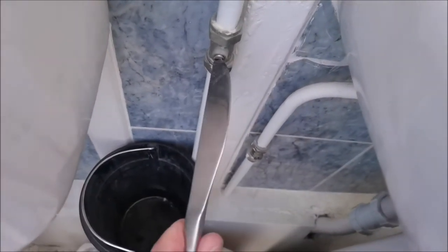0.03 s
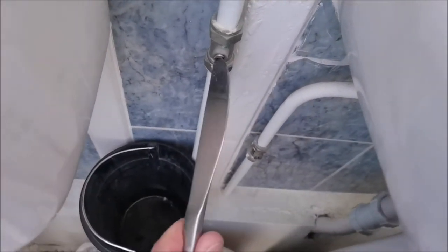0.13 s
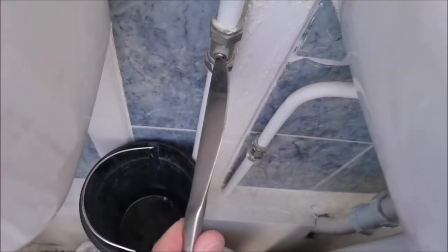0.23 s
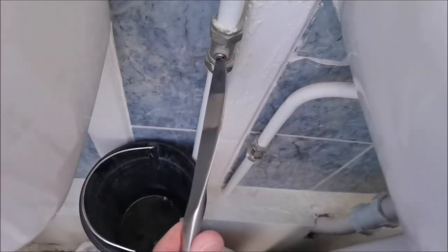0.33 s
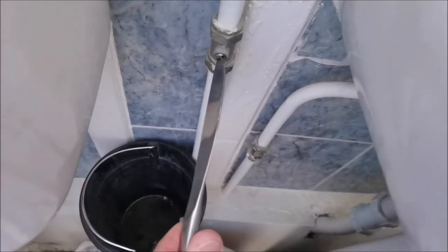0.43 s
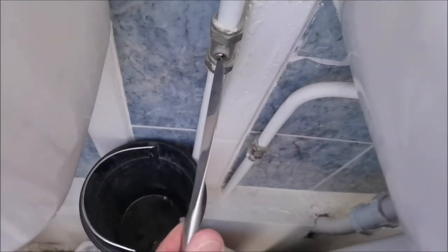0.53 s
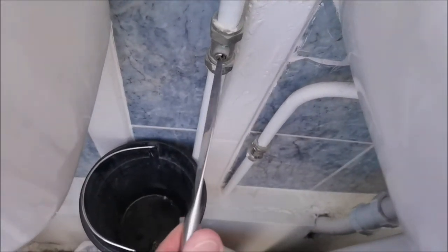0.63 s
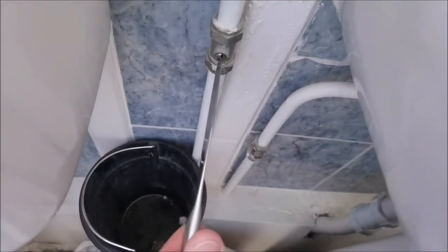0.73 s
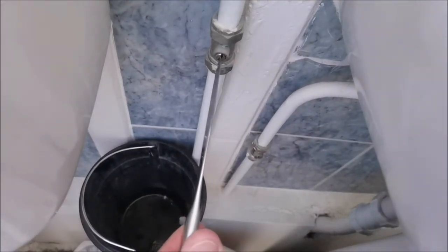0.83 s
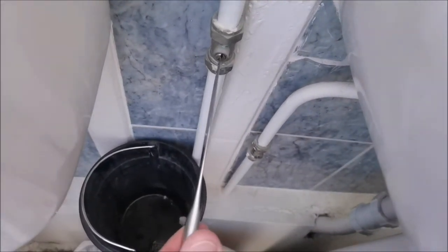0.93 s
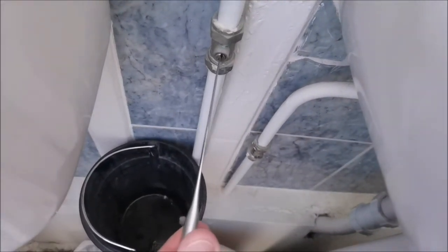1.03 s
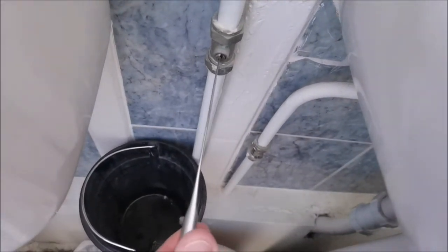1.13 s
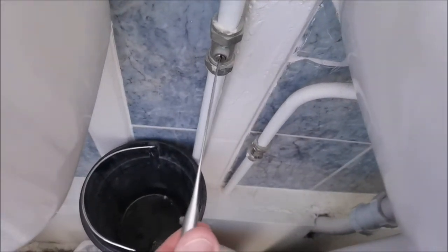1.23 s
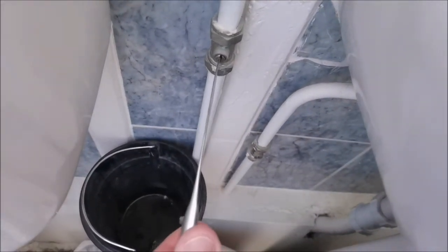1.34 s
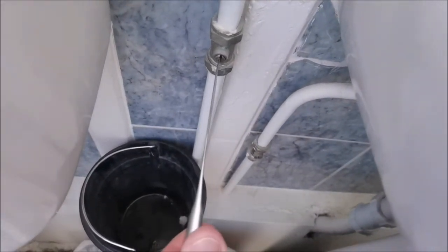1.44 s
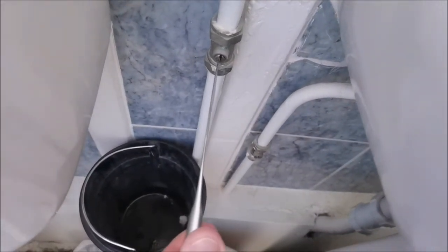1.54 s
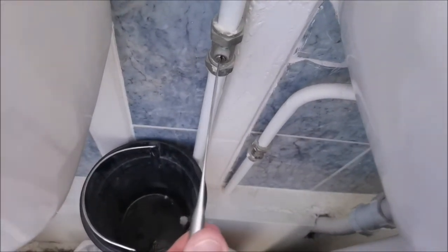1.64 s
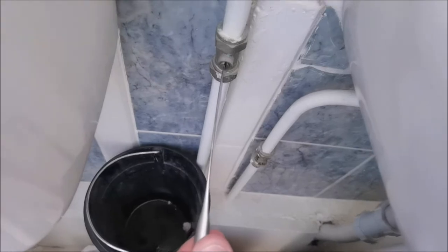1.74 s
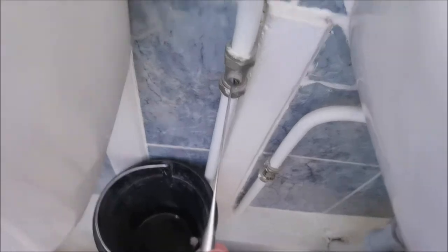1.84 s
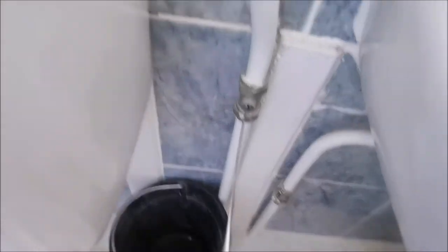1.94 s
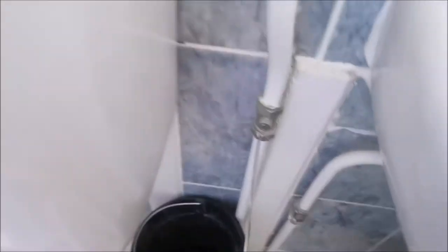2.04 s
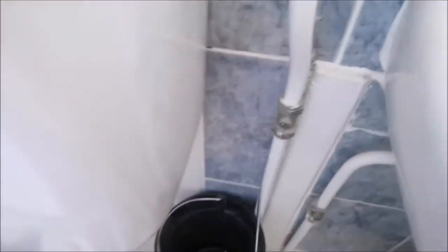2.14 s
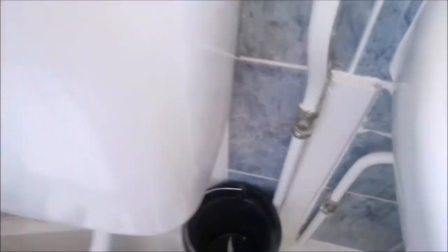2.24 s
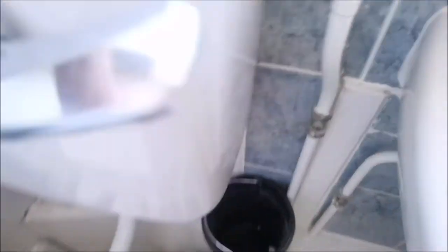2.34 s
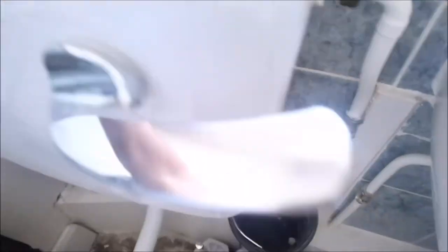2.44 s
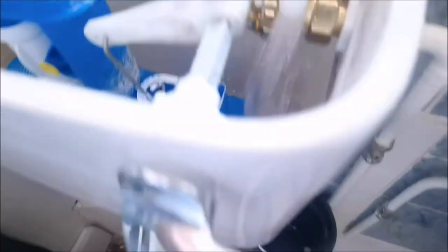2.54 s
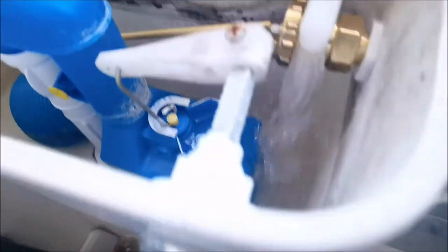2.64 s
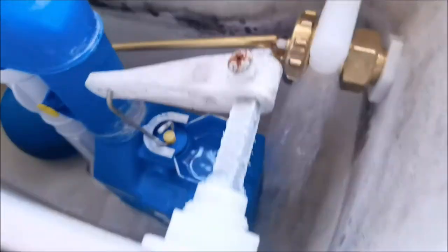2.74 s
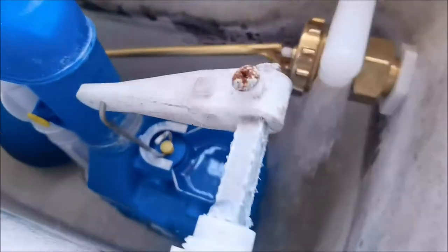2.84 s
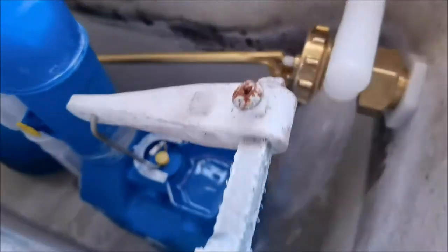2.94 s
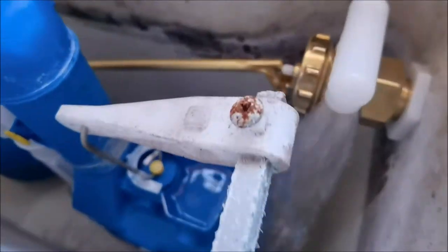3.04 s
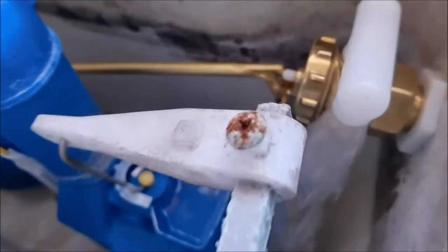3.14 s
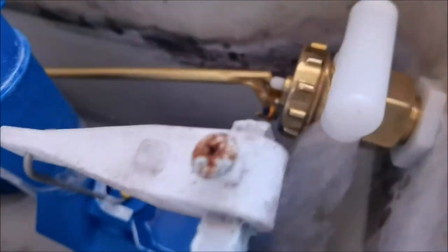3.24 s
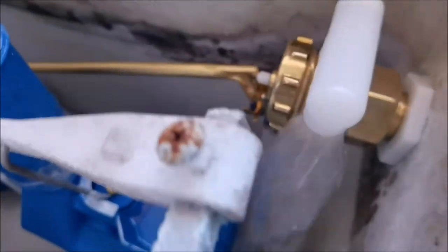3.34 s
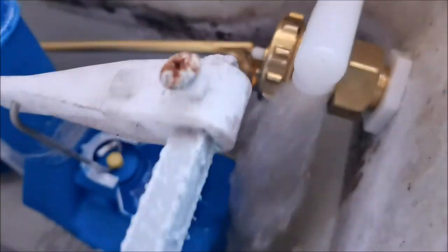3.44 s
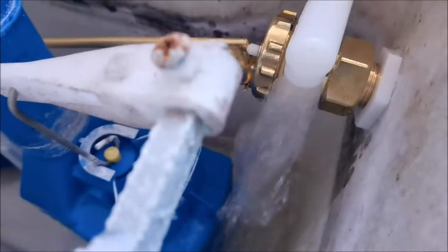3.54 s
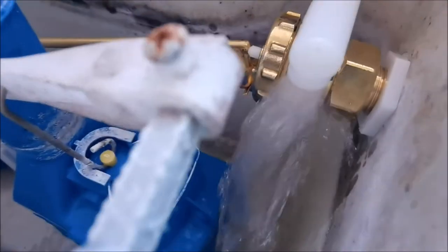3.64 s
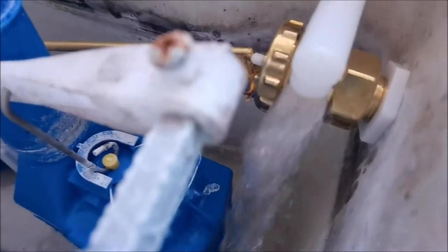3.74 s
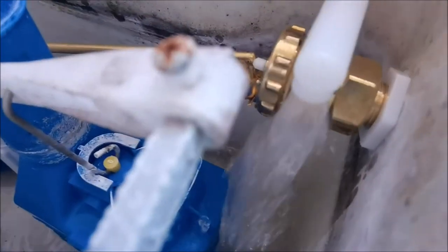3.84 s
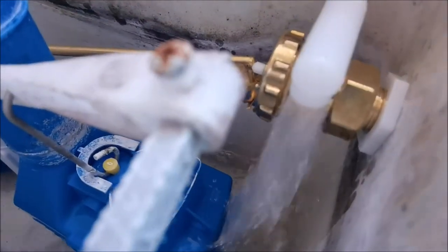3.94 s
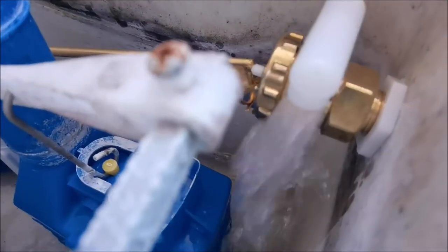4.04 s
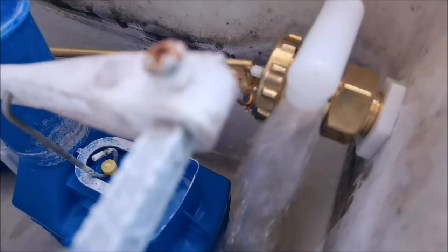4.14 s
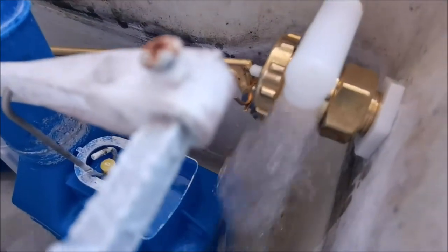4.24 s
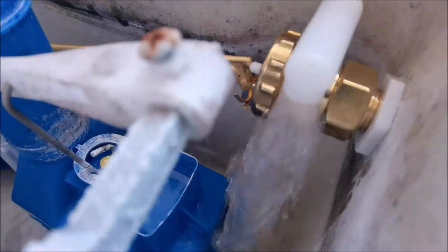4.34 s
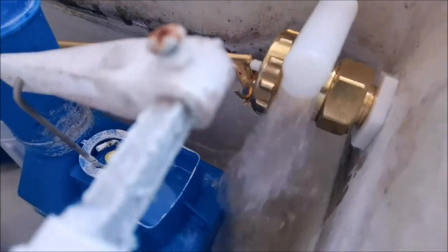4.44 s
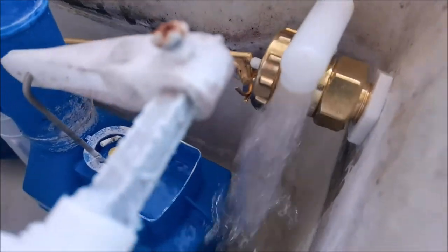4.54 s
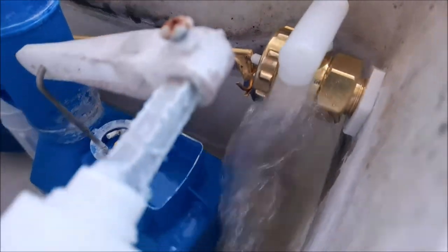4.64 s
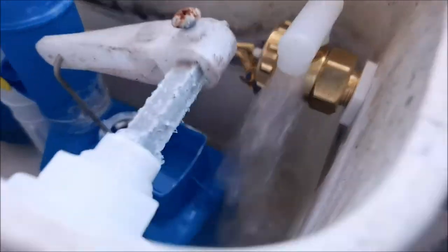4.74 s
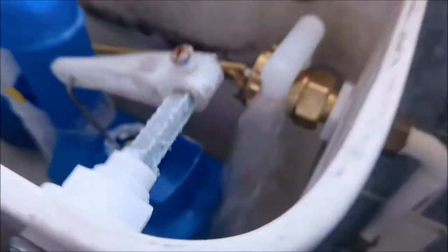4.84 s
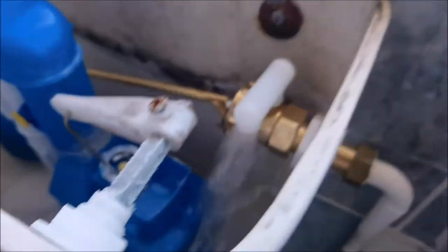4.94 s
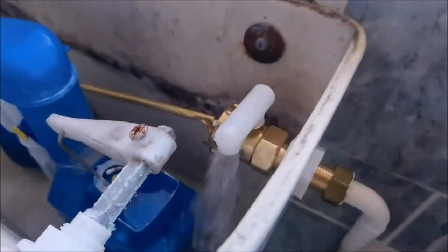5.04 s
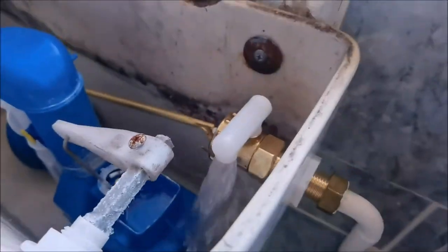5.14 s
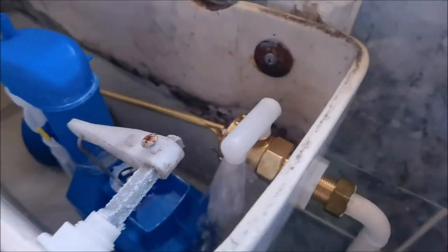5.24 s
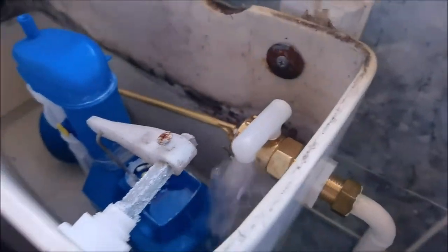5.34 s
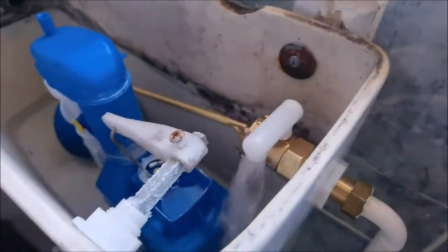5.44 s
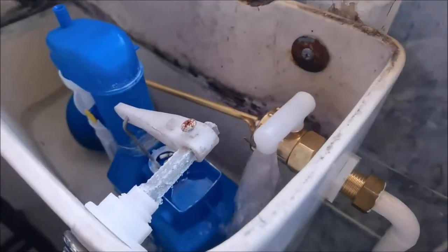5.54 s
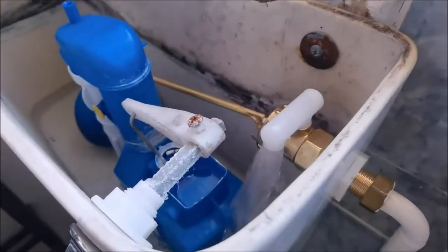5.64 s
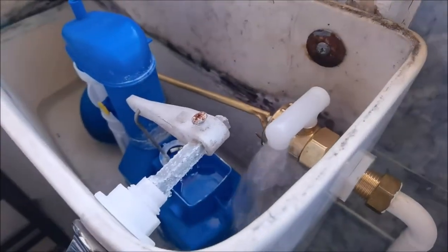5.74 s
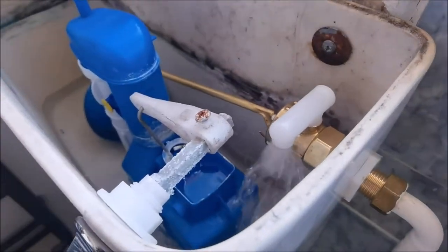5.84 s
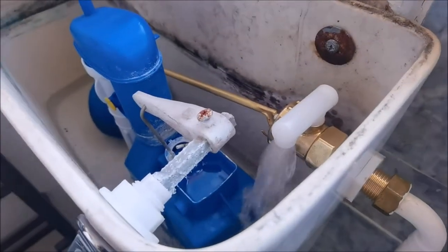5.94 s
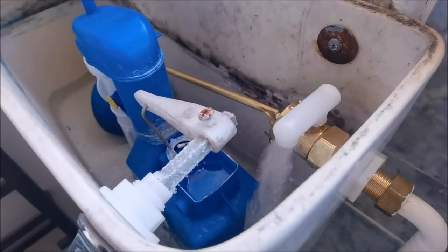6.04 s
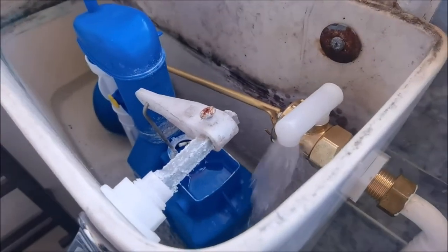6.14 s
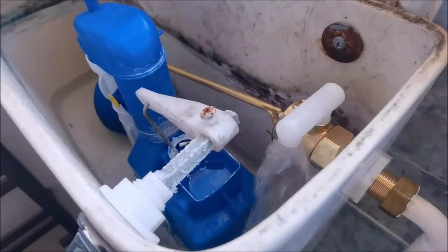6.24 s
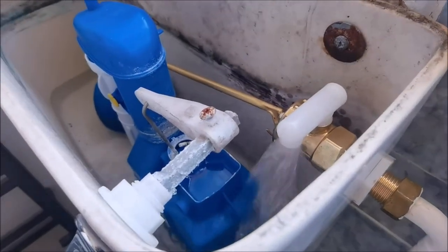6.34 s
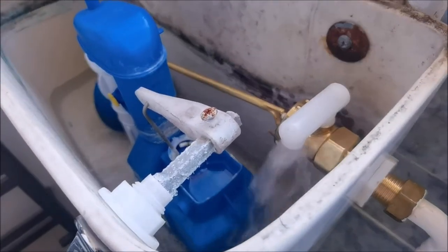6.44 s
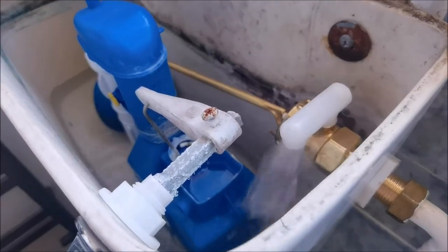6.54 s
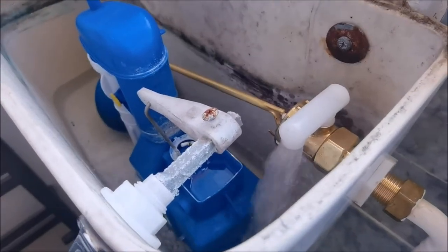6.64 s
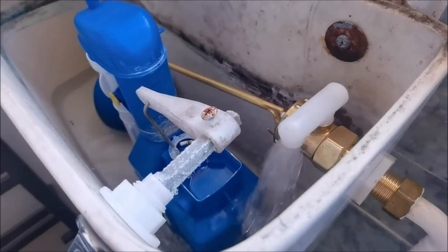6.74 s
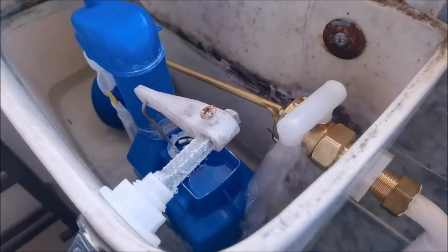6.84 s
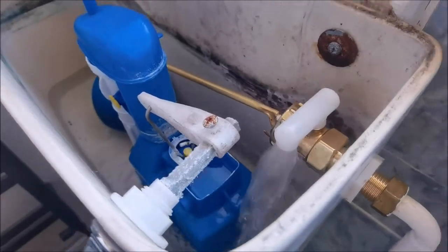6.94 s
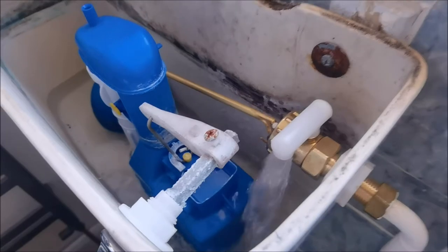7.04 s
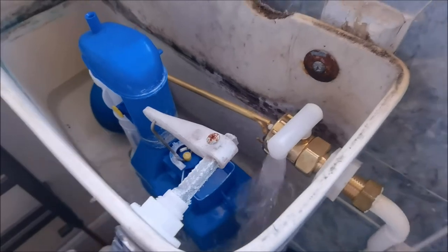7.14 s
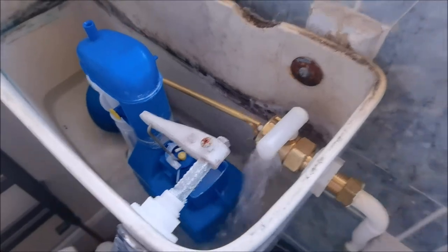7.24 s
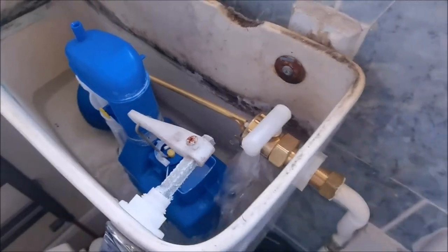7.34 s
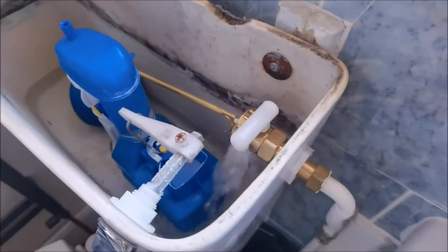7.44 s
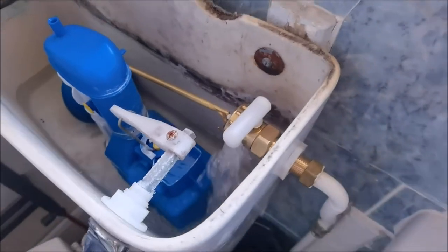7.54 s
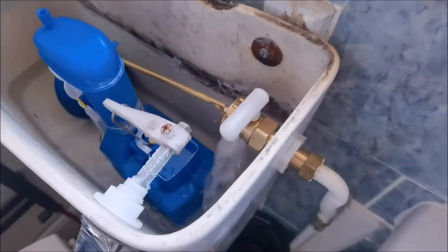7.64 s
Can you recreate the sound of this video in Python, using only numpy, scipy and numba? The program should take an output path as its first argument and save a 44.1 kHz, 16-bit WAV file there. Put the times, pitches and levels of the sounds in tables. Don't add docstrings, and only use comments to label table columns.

```python
import sys
import numpy as np
from scipy import signal
from scipy.fft import rfft, irfft
from scipy.io import wavfile
from scipy.ndimage import uniform_filter1d, minimum_filter1d, map_coordinates
from numba import njit

SR = 44100
rng = np.random.default_rng(int(sys.argv[2]) if len(sys.argv) > 2 else 0)


def to_wav(s):
    ch = np.atleast_2d(s).T
    pcm = np.round(np.clip(ch, -1, 1) * 32767)
    wavfile.write(sys.argv[1], SR, pcm.astype(np.int16))


def magnitude_from_level(level_db):
    exponent = np.asarray(level_db, float) / 20
    return 10 ** exponent


N = 338688

LIFT_S = 2.06
LIFT_FADE_DB_S = -40


def curve(table):
    s, *columns = np.transpose(table)
    return [np.interp(np.arange(N) / SR, s, column) for column in columns]


def on_log(table, hz):
    table_hz, db = np.transpose(table)
    return np.interp(np.log(hz + 1), np.log(table_hz), db)


def walk(rate, count=1, at=np.arange(N)):
    hop = 32
    k = int(SR / hop / rate)
    held = np.repeat(rng.standard_normal((count, N // hop // k + 1)), k, axis=1)
    slewed = uniform_filter1d(uniform_filter1d(held, k), k)
    return 1.314 * slewed[:, at // hop]


# (time [s], level over the hum [dB], length [s])
GULP_EVENTS = [(0.077, 8, 0.046), (0.322, 5, 0.02), (0.422, 6, 0.027), (.56, 8, 0.03), (0.692, 9, 0.027),
               (0.767, 4, 0.02), (0.884, 7, 0.014), (1.03, 5.5, .04), (1.39, 2, 0.081), (1.565, 4.5, 0.044),
               (1.975, 2, 0.05), (2.187, 4.5, 0.018)]


def gulps(t):
    return sum(db * np.exp(-((t - s) / length) ** 2) for s, db, length in GULP_EVENTS)


# (time [s], jet pressure re full [dB])
VALVE_OPENING = [
    (0, -1),
    (.05, -26.5),
    (.12, -13),
    (.22, -10),
    (.35, -3),
    (.6, -2.5),
    (.9, 0),
    (7.6, 0),
    (7.68, -1),
]


def water(tank, inside, near_db):
    t = np.arange(N) / SR
    valve_db, = curve(VALVE_OPENING)
    air = np.exp(-t / 1.9)
    hum_db = -33.5 + 4 * air + 0.46 * valve_db
    rumble_db = hum_db + 16.5 + 4.5 * np.exp(-((t - LIFT_S - 0.2) / 0.53) ** 2)
    gulping_db = hum_db + gulps(t) + 20.5
    splash_db = -29.5 + 4.5 * air + 0.11 * valve_db + 14
    hiss_db = -18.5 + valve_db
    spray_db = -35.5 + valve_db + 0.5 * inside + 21.5
    levels_db = np.array([rumble_db, gulping_db, splash_db, hiss_db, spray_db])
    levels_db += near_db + 0.81 * walk(22, count=5)
    gains = magnitude_from_level(levels_db)
    sputter = magnitude_from_level(0.66 * walk(19)[0] + 0.44 * walk(35)[0] + 1.99 * walk(300)[0])
    drive = magnitude_from_level(0.31 * walk(15)[0] + 0.86 * walk(200)[0]) * rng.standard_normal(N)

    shared, *wide = magnitude_from_level(8.5) * jet(tank, levels_db, sputter, patchy_db=1.35, bass_patchy_db=4.0)
    shared += pipe_singing(t, valve_db, gains, drive)
    shared += tank_ringing(tank, gains, drive)
    shared += rising_tones(t, inside, air, gains, drive)
    shared += air_columns(gains, drive)
    shared += gurgle(t, valve_db, gains, drive)
    shared += bubbles(levels_db[1] - 24.0, count=2000, cycles=5.42, scatter_db=4.0)
    return shared, np.array(wide)


# (frequency [Hz], level [dB per Hz])
JET_BY_PIPE = [(24, -49), (40, -17.5), (184, -7.5), (289, -29.5), (454, -1), (527, -22), (730, -14.5),
               (1240, -26), (1440, -13.5), (2430, -15), (4010, -10.5), (4430, -10.5), (6450, 7),
               (10400, -17.5), (15900, -26)]
# (frequency [Hz], level [dB per Hz])
JET_OVER_TANK = [(24, -50), (40, -22), (85, -16.5), (214, -14), (275, -6), (411, -16), (465, 3.5),
                 (514, -25.5), (1120, -19), (1330, -21.5), (2140, -14), (4320, -12.5), (7310, 6.5),
                 (9390, -16), (15900, -28)]


def jet(tank, levels_db, sputter, patchy_db, bass_patchy_db):
    frame, overlap = 1024, 768
    noise = sputter * rng.standard_normal((3, N))
    hz, s, bins = signal.stft(noise, SR, nperseg=frame, noverlap=overlap)
    at = np.minimum((s * SR).astype(int), N - 1)
    by_pipe_db = on_log(JET_BY_PIPE, hz)[:, None]
    over_tank_db = on_log(JET_OVER_TANK, hz)[:, None]
    colour_db = by_pipe_db * (1 - tank[at]) + over_tank_db * tank[at]
    regions_hz = np.array([150, 650, 2700, 6800, 12500])
    patches_hz = 16000 * np.linspace(0.05, 1, 40) ** 2
    depth_db = np.where(patches_hz < 200, bass_patchy_db, patchy_db)[:, None]
    surge_db = walk(21, count=40, at=at) * depth_db
    for centres_hz, rows_db in ((regions_hz, levels_db[:, at]), (patches_hz, surge_db)):
        place = np.interp(np.log(hz + 1), np.log(centres_hz), np.arange(len(centres_hz)))
        low = np.minimum(place.astype(int), len(centres_hz) - 2)
        share = (place - low)[:, None]
        colour_db = colour_db + rows_db[low] * (1 - share) + rows_db[low + 1] * share
    return signal.istft(bins * magnitude_from_level(colour_db), SR, nperseg=frame, noverlap=overlap)[1][:, :N]


@njit
def svf(x, hz, width):
    y, b, l, b2, l2, g, k = np.empty(len(x)), 0., 0., 0., 0., 0., 0.
    for i in range(len(x)):
        if i % 32 == 0:
            g = np.tan(np.pi * hz[i] / SR)
            k = width / hz[i]
        v = (b + g * (x[i] - l)) / (1 + g * (g + k))
        b, l = 2 * v - b, l + 2 * g * v
        v = (b2 + g * (k * v - l2)) / (1 + g * (g + k))
        b2, l2, y[i] = 2 * v - b2, l2 + 2 * g * v, k * v
    return y


def ring(modes, gains, drive, flicker_db):
    out = np.zeros(N)
    for hz, width, db in modes:
        rung = svf(drive, hz * (1 + 0.0041 * walk(3.146)[0]), 1.266 * width)
        region = np.searchsorted([1300, 4800], np.mean(hz)) + 1
        out += gains[region] * magnitude_from_level(db + flicker_db * walk(24)[0]) * rung
    return out


# (frequency [Hz], width [Hz], level [dB])
PIPE_RINGS = [(2970, 35, -20), (3340, 16, -13), (3900, 53, -11.5), (5100, 180, -2), (6340, 110, -13),
              (6600, 120, -13), (6950, 96, 1.5), (7830, 230, 0), (9080, 360, -0.5),
              (6520, 60, 6)]


def pipe_singing(t, valve_db, gains, drive):
    sing_db = 1.9 + 0.5 * valve_db - 54 * np.maximum(t - 1.58, 0)
    return magnitude_from_level(12.5 + sing_db) * ring(PIPE_RINGS, gains, drive, flicker_db=1.0)


# (frequency [Hz], width [Hz], level [dB])
TANK_RINGS = [(2923, 29, -10), (3161, 92, -8.5), (3730, 194, -10), (4460, 94, -3), (5213, 73, -3),
              (6210, 43, 4), (6650, 83, -19), (7900, 170, 0), (8255, 120, -2.5), (5800, 520, -36.5)]


def tank_ringing(tank, gains, drive):
    return magnitude_from_level(10.0) * np.sqrt(tank) * ring(TANK_RINGS, gains, drive, flicker_db=4.0)


def rising_tones(t, inside, air, gains, drive):
    pipe_hz = 2199 + 40 * t
    tank_hz = 1997 + 25.5 * t - 65 * inside
    upper_hz = np.where(t < LIFT_S, pipe_hz, tank_hz)
    upper_db = 6.5 - 4.5 * inside + 1.5 * (t < LIFT_S)
    upper_db -= 14 * np.maximum(1.1 - t, 0)
    upper_db -= 10 * np.exp(-((t - LIFT_S) / 0.18) ** 2)
    lower_hz = 723 + 48.4 * inside
    lower_db = -0.6 + 7 * air
    return ring([(upper_hz, 70., upper_db), (lower_hz, 40., lower_db)], gains, drive, flicker_db=2.0)


# (frequency [Hz], width [Hz], level [dB])
AIR_RINGS = [(272.5, 17.7, -12.5), (453.5, 23.4, 0), (478.4, 12.8, 0), (548, 13, -7.5), (1150, 46, -11.5),
             (1671, 24, -11.5)]


def air_columns(gains, drive):
    return magnitude_from_level(10.5) * ring(AIR_RINGS, gains, drive, flicker_db=2.5)


# (frequency [Hz], width [Hz], level [dB])
GURGLE_RINGS = [(185, 18.4, -7), (1452, 30, -6.5), (1794, 170, -13), (940, 95, -17)]


def gurgle(t, valve_db, gains, drive):
    gurgle_db = 0.4 * valve_db - 7.5 * t + LIFT_FADE_DB_S * np.maximum(t - LIFT_S, 0)
    return magnitude_from_level(19.0 + gurgle_db) * ring(GURGLE_RINGS, gains, drive, flicker_db=2.0)


def bubbles(level_db, count, cycles, scatter_db):
    out = np.zeros(N + SR)
    for when, size, loud in rng.random((count, 3)):
        hz, start = 350 * 12 ** size, int(when * N)
        turns = np.arange(int(3 * cycles * SR / hz)) * hz / SR
        tone = np.sin(2 * np.pi * turns * (1 + 0.058 * turns / cycles))
        tone *= np.exp(-turns / cycles) * (1 - np.exp(-turns))
        out[start:start + len(turns)] += magnitude_from_level(level_db[start] - scatter_db * np.log(loud)) * tone
    return out[:N]


# (time [s], peak level [dB], push [ms], body ring [Hz])
FINGER_THUMPS = [(1.266, -16.5, 1.1, 120), (1.479, -31, 2, 110), (2.054, -33, 1.7, 120),
                 (2.497, -27, 3, 88), (2.658, -17, 0.22, 145), (3.044, -10, .5, 94), (3.054, -10, 3, 85),
                 (3.088, -25, 2.7, 82), (3.375, -0.5, .61, 97), (3.407, -8.5, 2.7, 93), (3.418, -15, 3, 93),
                 (3.538, -19, 0.61, 103), (3.597, -26, 3.3, 80), (3.645, -27, 3, 80), (4.0, -29, 1.8, 109),
                 (4.269, -33, 3, 95), (4.491, -28, 2.2, 85), (5.019, -33, 3, 95), (5.148, -14.5, 1.1, 95),
                 (6.002, -29, 2.4, 110), (6.404, -31, 2.9, 104), (7.122, -23, 1.7, 85), (7.3, -29, 2.3, 92),
                 (7.64, -33, 3, 90)]
# (time [s], level [dB])
NAIL_TICKS = [
    (3.043, 6),
    (3.374, -18),
    (3.538, -18),
]


def thumps():
    out = np.zeros((2, N + SR))
    lead = SR // 50
    t = np.arange(-lead, SR // 8) / SR
    for side, (late_s, port_db) in enumerate([(0.0009, 0), (0, 2.5)]):
        u, gain = t - late_s, magnitude_from_level(port_db)
        for s, db, push_ms, hz in FINGER_THUMPS:
            push = -0.5 * np.exp(-0.5 * (u / push_ms * 1000) ** 2)
            decay_s = np.where(u > 0, 0.012, 0.006)
            body = -0.55 * np.cos(2 * np.pi * hz * u) * np.exp(-np.abs(u) / decay_s)
            start = int(s * SR) - lead
            out[side, start:start + len(t)] += gain * magnitude_from_level(db) * (push + body)
        for s, db in NAIL_TICKS:
            start = int(s * SR) - lead
            out[side, start:start + len(t)] -= gain * magnitude_from_level(db) * np.exp(-np.abs(u) / 0.00041)
    return out[:, :N]


@njit
def tiles(x, lags, drift, gain, damp):
    line, soft, out = np.zeros((8, 4096)), np.zeros(8), np.zeros((2, len(x)))
    for i in range(len(x)):
        total = 0.
        for k in range(8):
            back = lags[k] + drift[k, i]
            j = int(back)
            old = line[k, (i - j) & 4095] * (1 + j - back) + line[k, (i - j - 1) & 4095] * (back - j)
            soft[k] += (1 - damp) * (gain[k] * old - soft[k])
            total += soft[k]
            out[k % 2, i] += soft[k]
        for k in range(8):
            line[k, i & 4095] = x[i] + soft[k] - total / 4
    return out


def tiled_room(flow):
    lags = np.array([331., 457., 613., 787., 953., 1151., 1367., 1601.])
    return tiles(flow, lags, 8 * walk(2.2, count=8), magnitude_from_level(-60 * lags / SR / 0.24), 0.047)


# (time [s], pipe 0 to over tank 1, above rim 0 to down inside 1,
# right port lag [ms], nearness to the jet [dB])
PHONE_PATH = [(0, 0.033, 0, .22, 1.5), (1, 0, 0.063, 0.26, -2.5), (1.75, 0, 0, 0.23, -1.5),
              (1.9, 0.16, 0.1, 0.32, -0.5), (2.15, .2, 0, 0.46, -1), (2.4, 0.72, 0.91, 0.509, .5),
              (3, 1, 1, 0.48, 0), (3.7, 0.88, 0.93, 0.54, -0.5), (4.2, 1, 0.98, 0.46, -1.5),
              (4.7, 0.86, 0.22, 0.367, -2.5), (5.4, 1, 0.36, 0.36, -3), (6, 0.76, 0.2, 0.4, -2.5),
              (7.68, 0.88, 0, 0.37, -3)]
# (frequency [Hz], left minus right [dB])
PORT_BALANCE = [(60, 6), (110, -5), (200, 5), (380, -0.5), (700, 5), (1290, -2), (2380, 0), (4400, -1.5),
                (8120, -2), (15000, 6)]
# (frequency [Hz], width [Hz], level [dB])
CASE_SHADOWS = [(4440, 147, -6), (11480, 210, -5), (1250, 55, -2), (647, 25, -8)]


def scene():
    tank, inside, lag_ms, near_db = curve(PHONE_PATH)
    flow, wide = water(np.clip(tank, 0, 1), inside, near_db)
    late = map_coordinates(flow, [np.arange(N) - lag_ms * SR / 1000], order=1, mode="nearest")
    own = magnitude_from_level(-5.5) * tiled_room(flow) + magnitude_from_level(-7) * wide
    hz = np.fft.rfftfreq(N, 1 / SR)
    scatter = hz / np.sqrt(hz ** 2 + 800 ** 2)
    direct = magnitude_from_level(-4.0) / np.sqrt(1 + (hz / 9000) ** 2)
    shadow_db = sum(db / (1 + ((hz - f) / width) ** 2) for f, width, db in CASE_SHADOWS)
    ports = magnitude_from_level(np.outer([0.5, -0.5], on_log(PORT_BALANCE, hz)) + shadow_db)
    airborne = irfft(ports * (direct * rfft(np.array([flow, late])) + scatter * rfft(own)), N)
    pan_db = -0.6 + 2.5 * inside
    return airborne * magnitude_from_level(np.array([pan_db + 0.41, -pan_db - 0.3]) / 2) + thumps()


@njit
def follow(x, attack, release):
    y, e = np.empty(len(x)), 0.
    for i in range(len(x)):
        e += (x[i] - e) * (attack if x[i] > e else release)
        y[i] = e
    return y


def low_pass(x):
    return signal.sosfilt(signal.butter(12, 15850, fs=SR, output="sos"), x)


def record(dry):
    x = signal.sosfilt(signal.butter(4, 52, "high", fs=SR, output="sos"), dry)
    bass = signal.sosfilt(signal.butter(2, 2000, fs=SR, output="sos"), x)
    attack_s, release_s, hold = 0.0032, 0.034, 1101
    level = follow(np.abs(bass).max(axis=0), 1 / (attack_s * SR), 1 / (release_s * SR))
    level = -minimum_filter1d(-level, size=hold, origin=hold // 2)
    x = x * np.minimum(1, magnitude_from_level(-12.5) / (level + 1e-9))
    mix = np.clip(x, -0.93, 0.93)
    return low_pass(mix)


dry = scene()
out = record(dry)
to_wav(out)
```